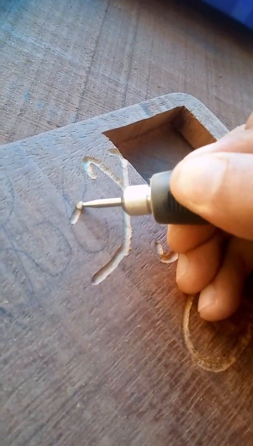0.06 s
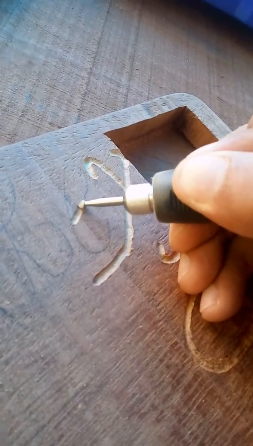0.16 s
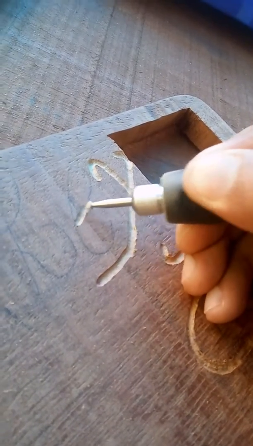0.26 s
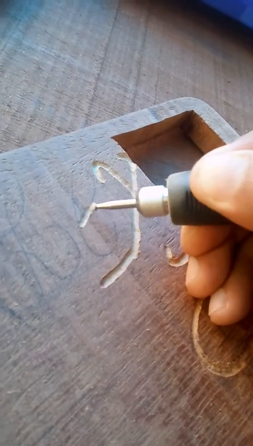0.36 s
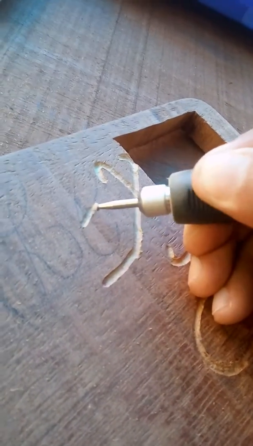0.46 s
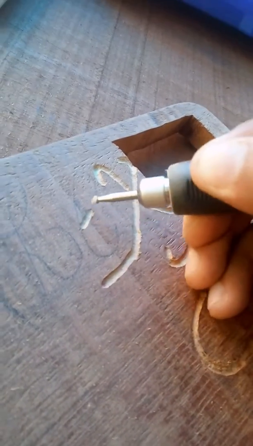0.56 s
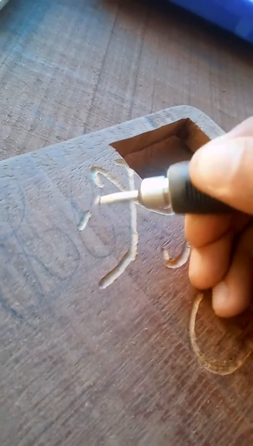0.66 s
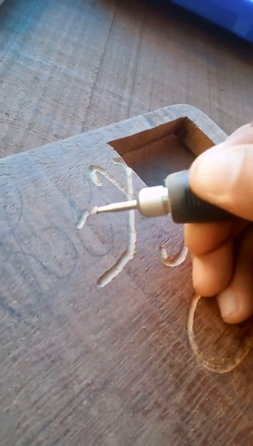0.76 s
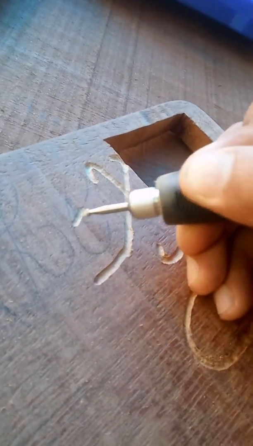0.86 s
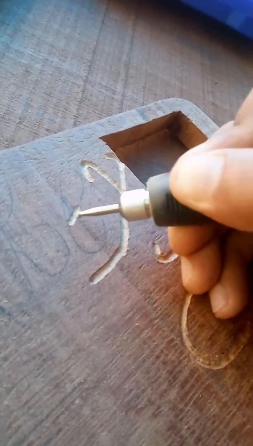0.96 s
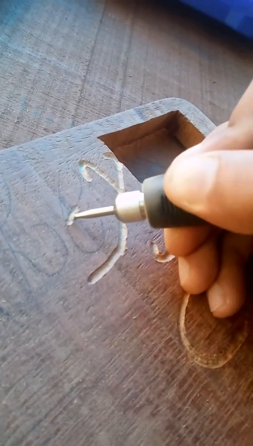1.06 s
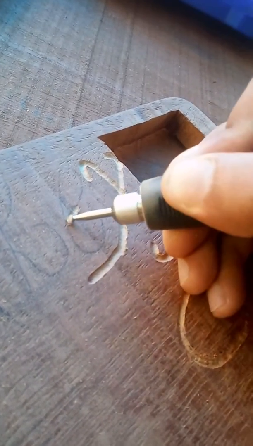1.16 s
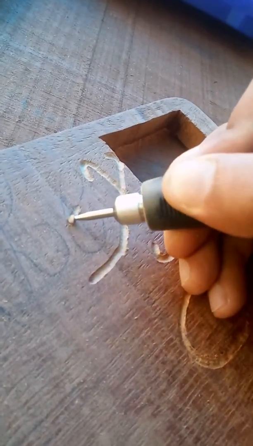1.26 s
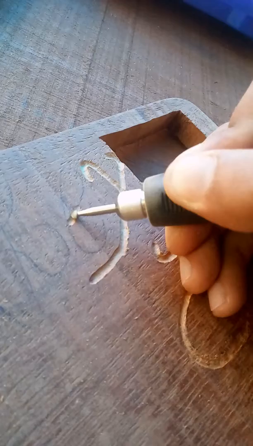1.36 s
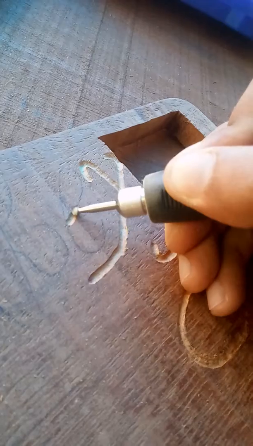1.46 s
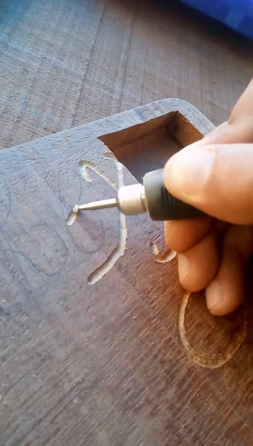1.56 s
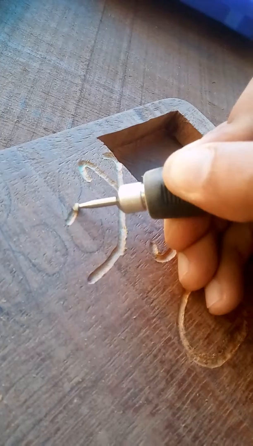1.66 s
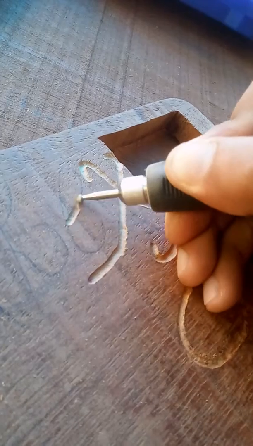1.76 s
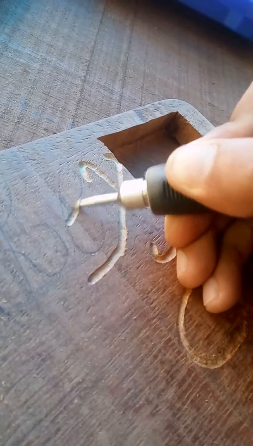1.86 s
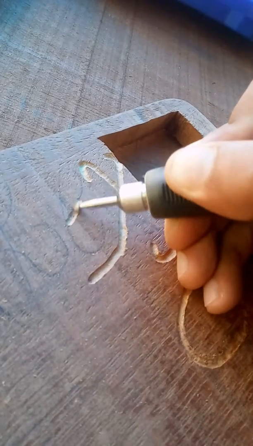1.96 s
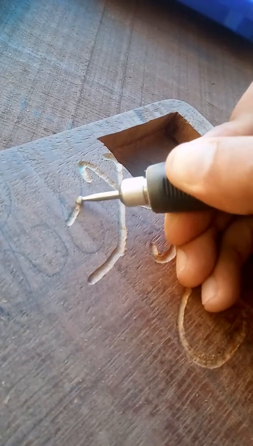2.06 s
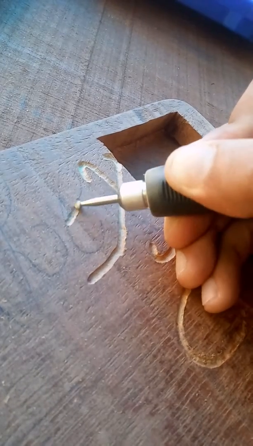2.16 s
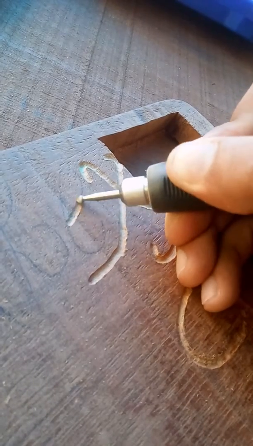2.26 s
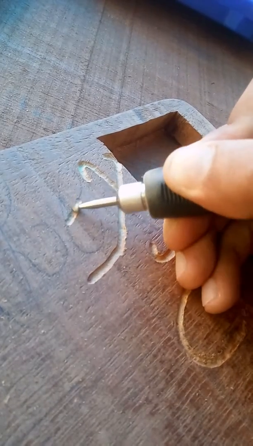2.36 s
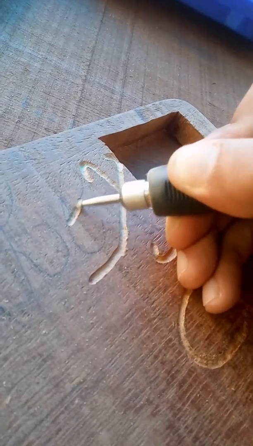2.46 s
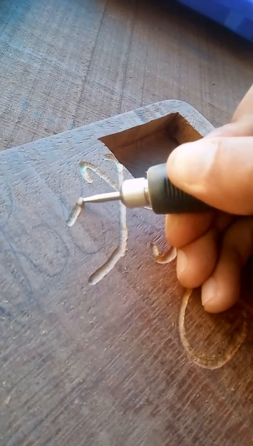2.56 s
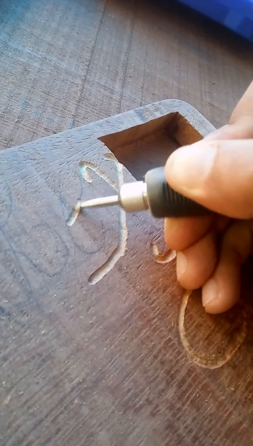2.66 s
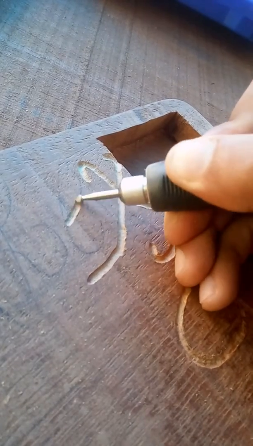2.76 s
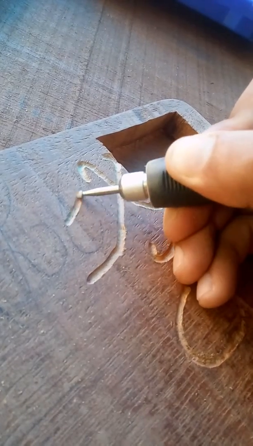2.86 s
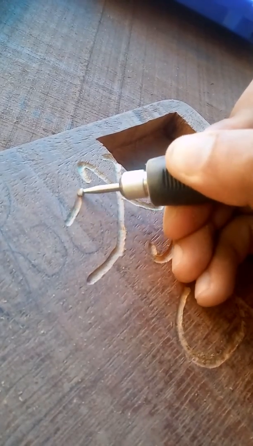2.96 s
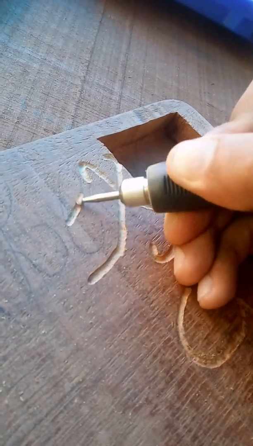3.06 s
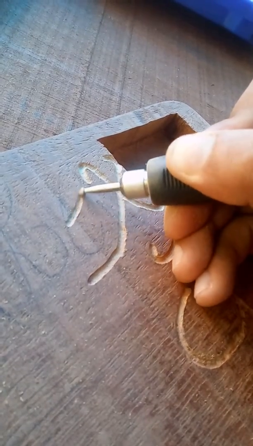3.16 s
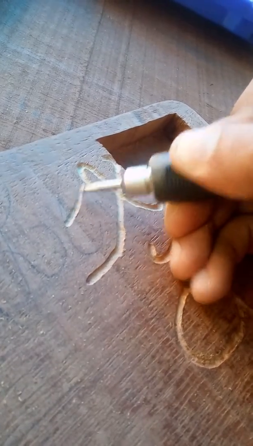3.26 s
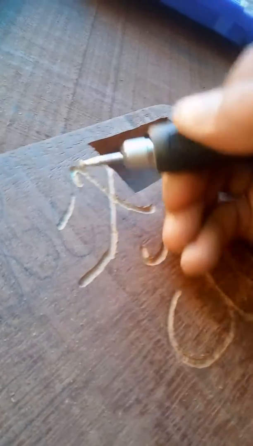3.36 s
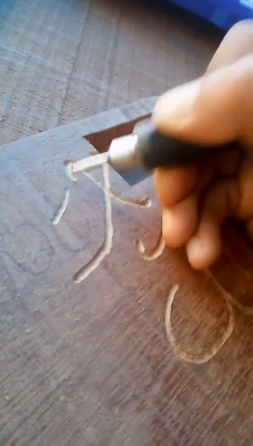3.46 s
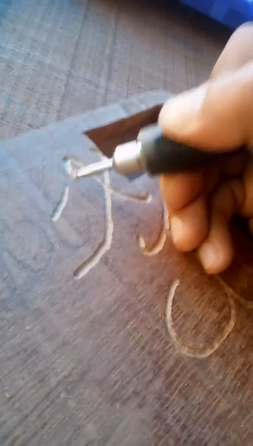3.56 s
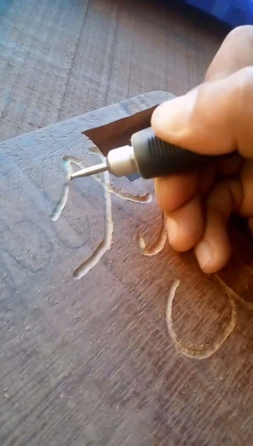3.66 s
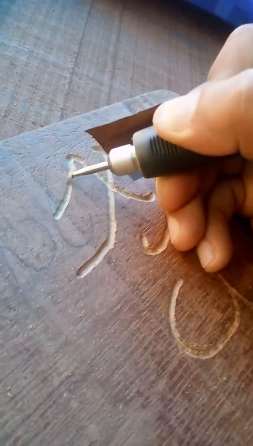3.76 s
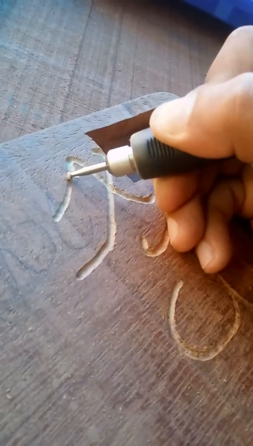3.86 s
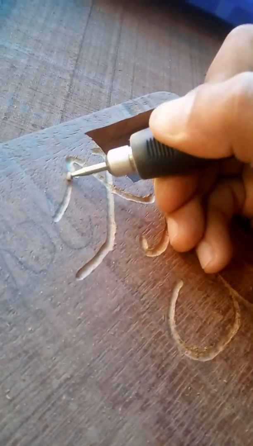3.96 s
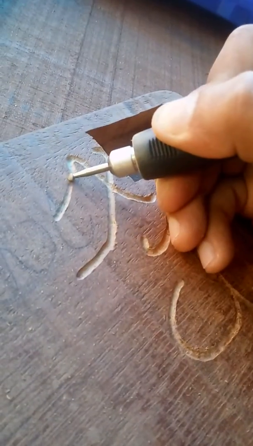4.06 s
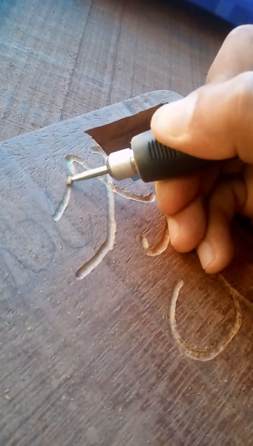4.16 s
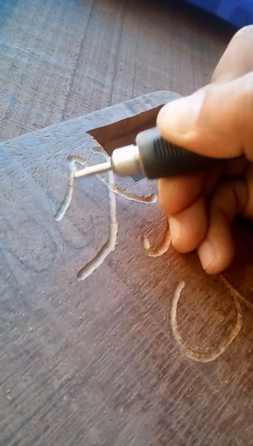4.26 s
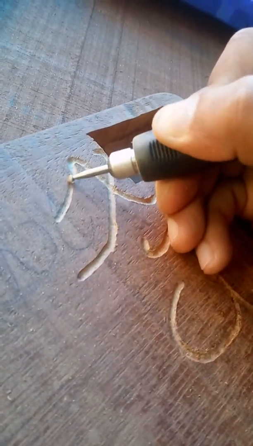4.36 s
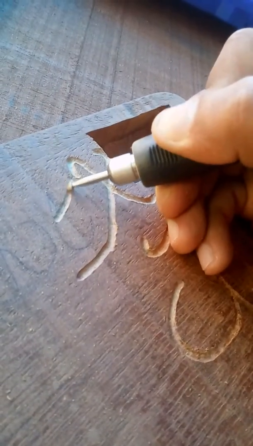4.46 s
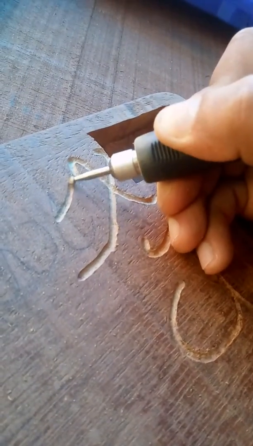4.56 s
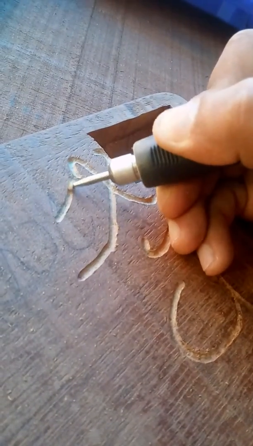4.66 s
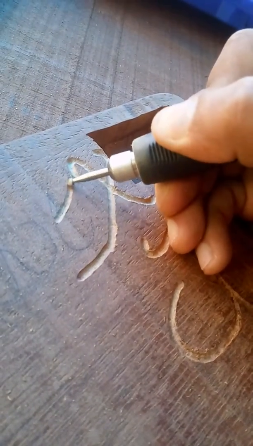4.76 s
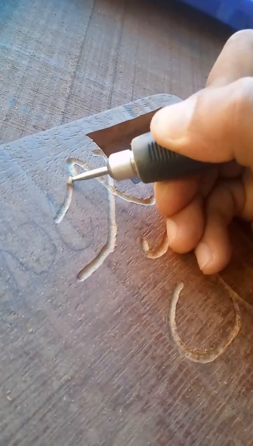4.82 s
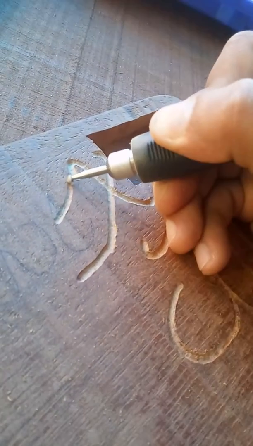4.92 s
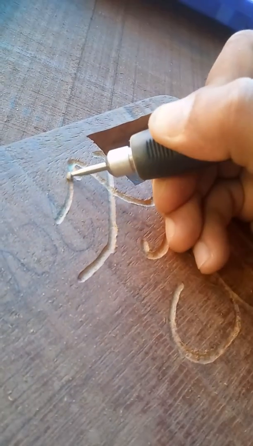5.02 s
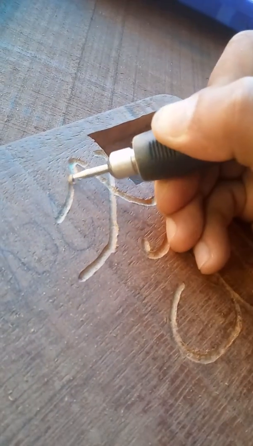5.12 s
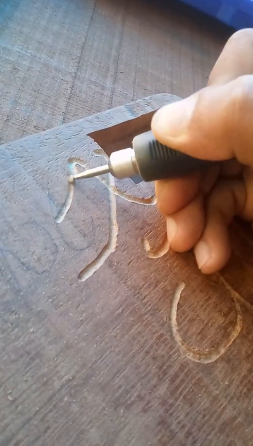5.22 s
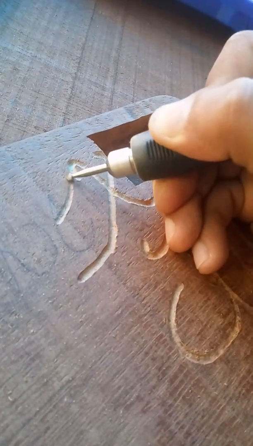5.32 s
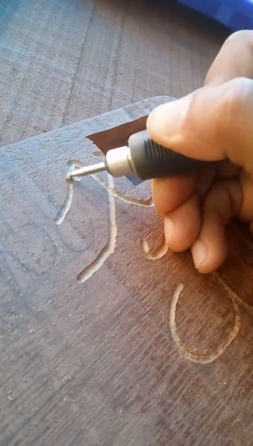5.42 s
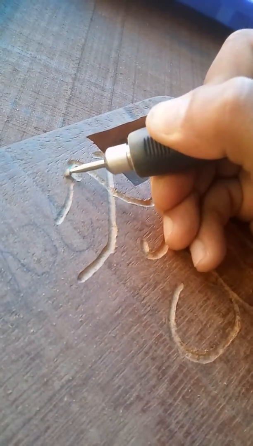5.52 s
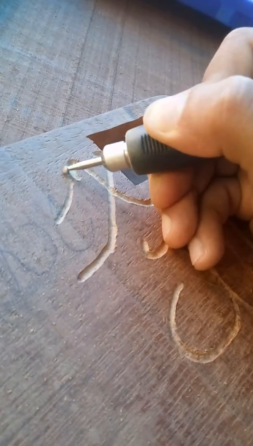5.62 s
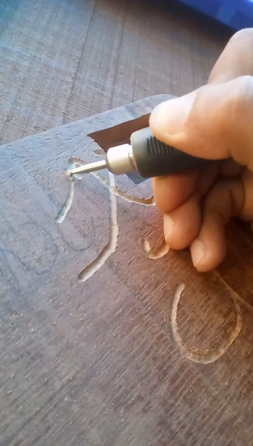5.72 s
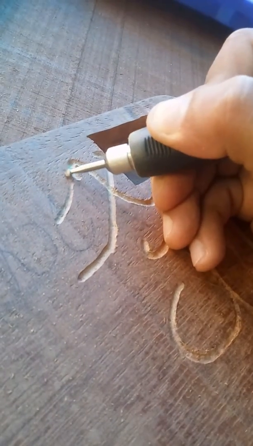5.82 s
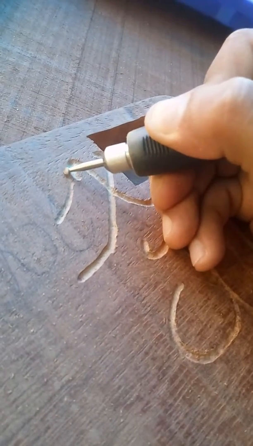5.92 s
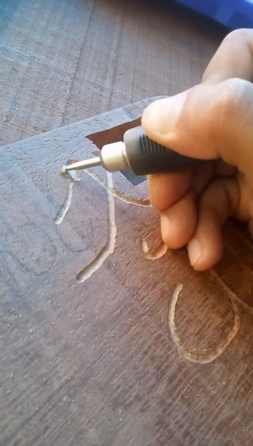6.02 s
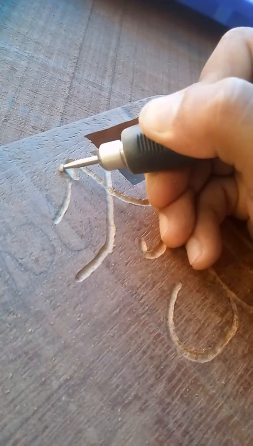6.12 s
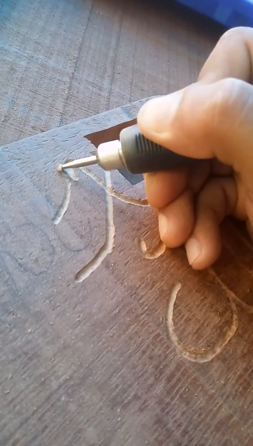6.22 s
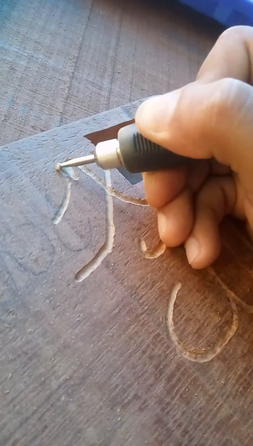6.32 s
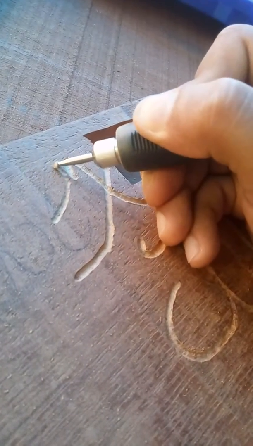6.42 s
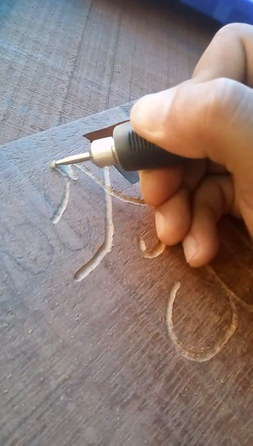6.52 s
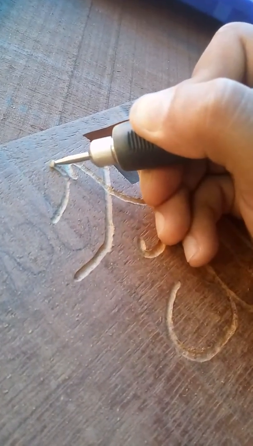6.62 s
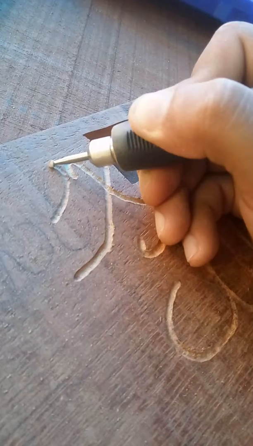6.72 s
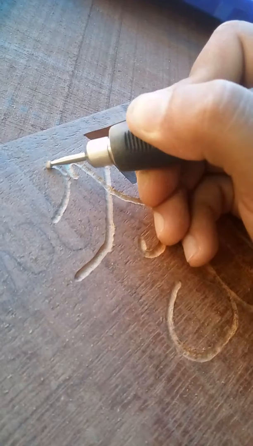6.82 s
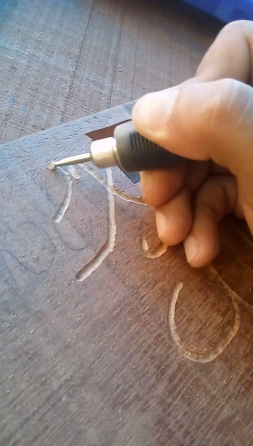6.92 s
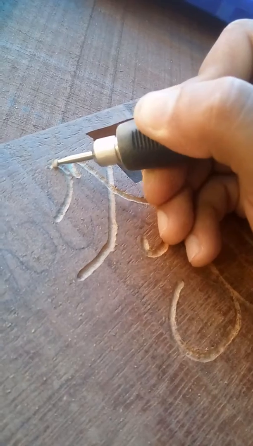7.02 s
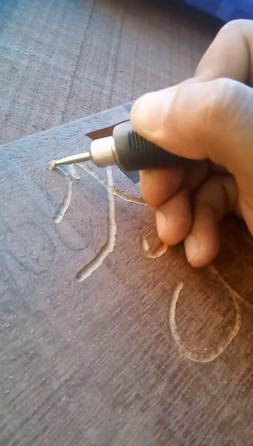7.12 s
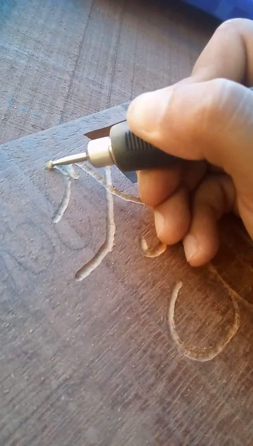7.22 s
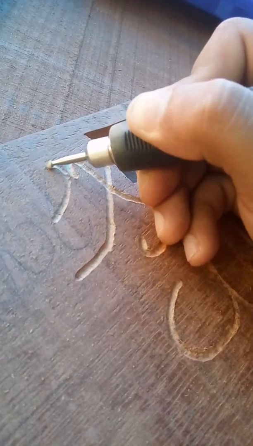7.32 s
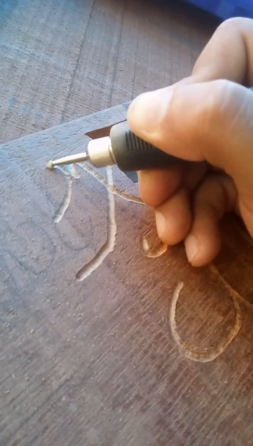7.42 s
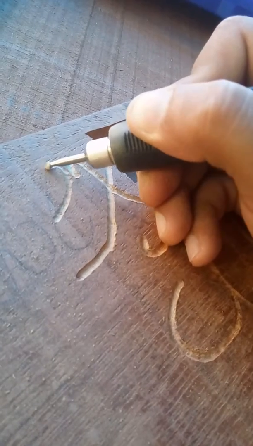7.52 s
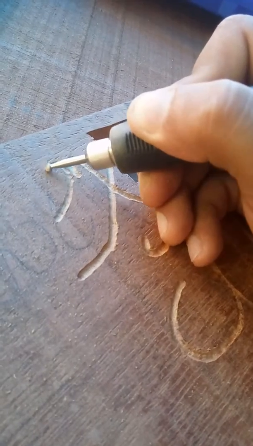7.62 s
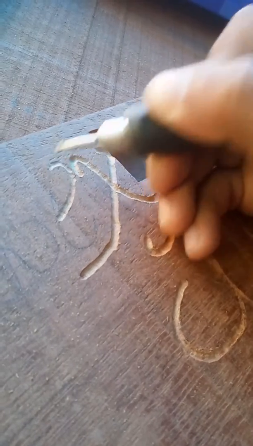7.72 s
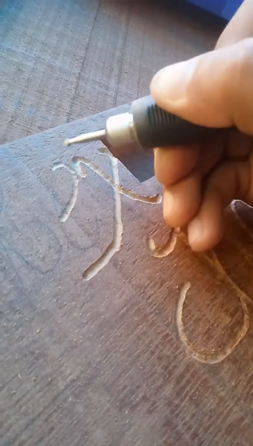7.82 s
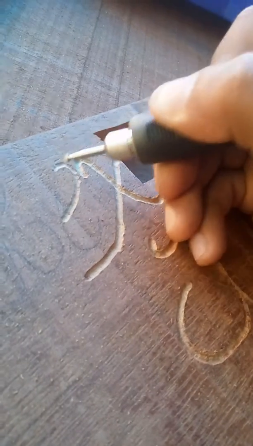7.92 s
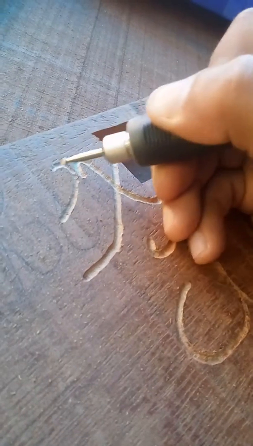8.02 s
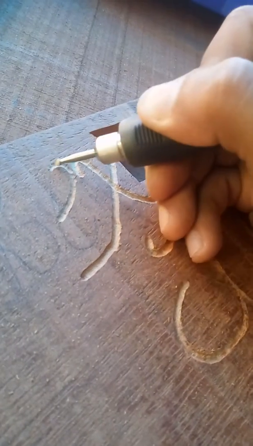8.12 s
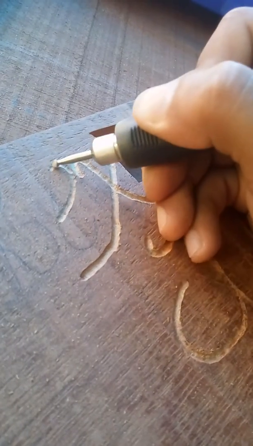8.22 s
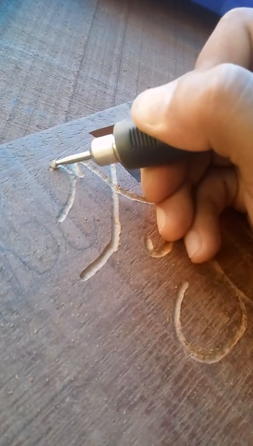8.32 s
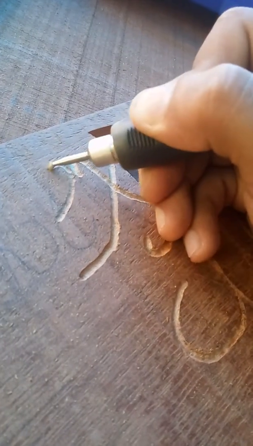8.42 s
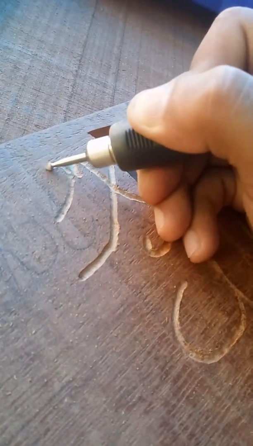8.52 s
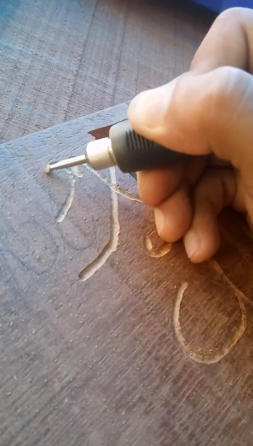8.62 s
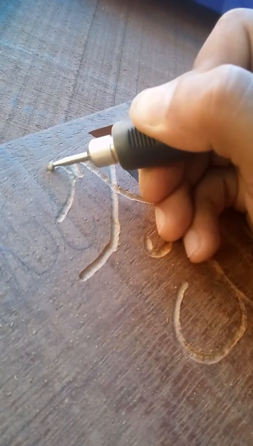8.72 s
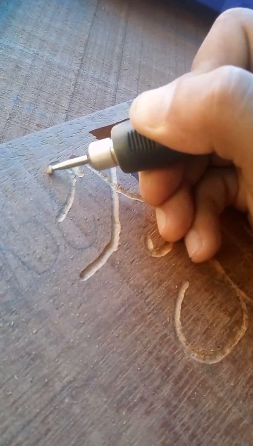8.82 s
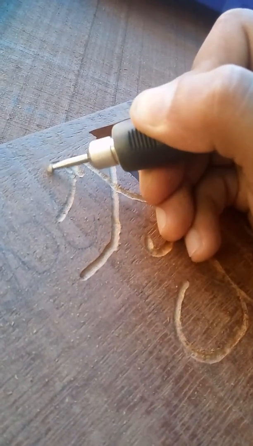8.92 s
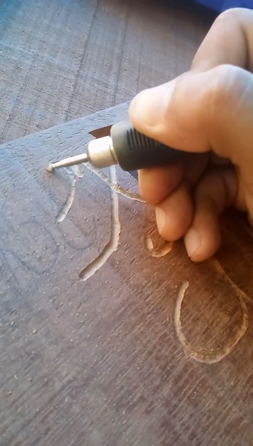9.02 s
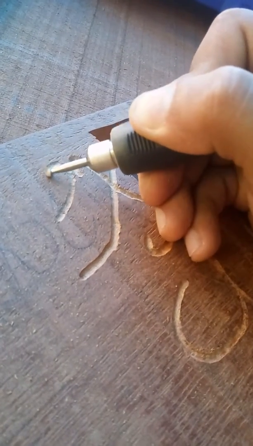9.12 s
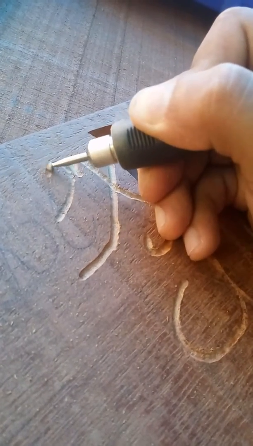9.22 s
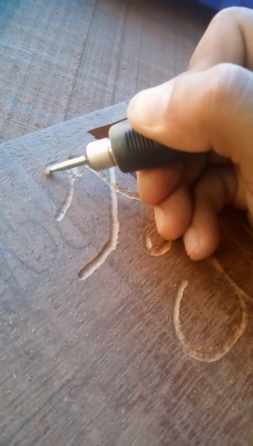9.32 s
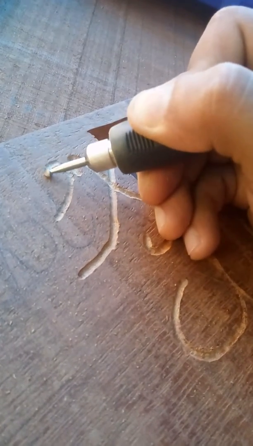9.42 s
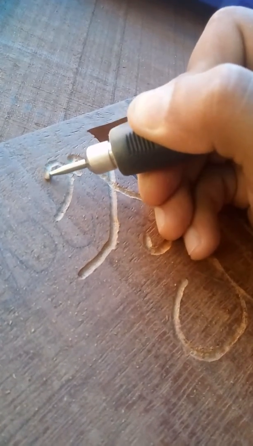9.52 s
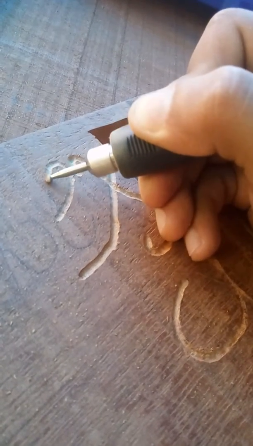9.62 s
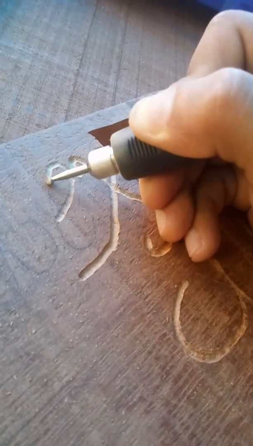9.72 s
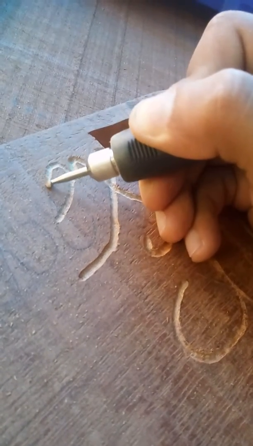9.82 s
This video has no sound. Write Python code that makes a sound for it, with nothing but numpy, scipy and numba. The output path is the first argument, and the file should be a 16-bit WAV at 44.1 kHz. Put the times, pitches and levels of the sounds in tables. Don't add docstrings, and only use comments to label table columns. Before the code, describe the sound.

A small electric engraver runs continuously, close to a stereo microphone indoors, its whine holding nearly steady with slight sags under load. At 0 s it is already grinding wood, lifting at about 0.2 s to a quieter airy whir. From 1.3 to 3.3 s come short rasping strokes, nasal and ringing, with gritty spray and high bearing hiss; the left side is muffled. It idles until 3.9 s, then makes lighter, broken touches and a longer stroke around 4.8-5.1 s. At 5.4 s the left side suddenly opens and the level jumps; firmer, buzzier cuts follow almost back to back, becoming fuller until 6.8 s. Dull low thumps of the hand on the microphone fall near 5.8, 7.2 and, hardest, 8.9 s, with faint rubbing. The cut weakens around 7.7-8.2 s, then strong strokes resume, separated by brief gaps, continuing to the end near 9.9 s.

```python
import sys
import numpy as np
from scipy import signal
from scipy.fft import rfft, irfft
from scipy.io import wavfile
from scipy.ndimage import uniform_filter1d
from numba import njit

SR = 44100
rng = np.random.default_rng(int(sys.argv[2]) if len(sys.argv) > 2 else 0)


def rack_gain(trim_db):
    fader = np.asarray(trim_db, float)
    return 10 ** (fader / 20)


def pcm_store(signal):
    levels = np.round(np.clip(np.atleast_2d(signal), -1, 1) * 32767)
    wavfile.write(sys.argv[1], SR, levels.astype(np.int16).T)


N = 435708
OPEN_S, SETTLED_S = 5.385, 6.8

# (time [s], speed [Hz])
SHAFT_SPEED = [(0.0, 339.5), (0.2, 337.8), (0.6, 344.1), (1.28, 348.2), (1.73, 345.7), (1.94, 341.1),
               (2.64, 342.3), (3.41, 341.2), (3.92, 346.0), (4.23, 341.7), (4.67, 344.5), (5.14, 341.3),
               (5.94, 341.6), (6.87, 332.2), (7.1, 337.6), (7.64, 336.5), (8.2, 345.0), (9.88, 340.2)]
# (middle [s], length [s], shaft hum [dB], speed sag [Hz])
DIGS = [(0.073, 0.082, -46, 0), (1.73, 0.079, -38, 0), (1.85, 0.035, -35, 0), (2.338, 0.037, -51, 0),
        (2.838, 0.16, -44, 5), (2.979, 0.18, -48, 10), (3.23, 0.097, -52, 5.5), (4.203, 0.049, -45, 0),
        (4.916, 0.045, -36, 0), (5.074, .14, -41, 0), (5.438, 0.12, -38.5, 0), (5.63, .22, -73, 7.5),
        (5.79, 0.075, -54, 1.5), (6.153, .2, -42, 2), (6.727, 0.31, -40.5, 0), (7.448, .25, -35.5, 0),
        (8.55, .14, -34.5, 2), (8.88, .1, -45, 3), (9.091, .13, -45, 2), (9.845, 0.042, -40, 1)]
# (bit down [s], bit lifts [s], bite [dB], board ring [dB], bearing hiss [dB])
STROKES = [(-.05, 0.224, -20, -26, -34), (1.284, 1.32, -36, -28.5, -45),
           (1.339, 1.697, -22, -26, -30), (1.695, 1.898, -19.5, -24, -28.5),
           (2.025, 2.45, -21, -25, -31.5), (2.593, 2.743, -21.5, -25.5, -32),
           (2.762, 3.059, -19, -24, -31), (3.147, 3.26, -17.5, -29, -31.5),
           (3.924, 4.1, -23.5, -35, -25.5), (4.1, 4.222, -21.5, -46, -27.5),
           (4.419, 4.535, -25.5, -30, -26.5), (4.651, 4.773, -26, -28, -36.5),
           (4.784, 5.141, -22, -25.5, -30), (5.237, 5.31, -27.5, -30.5, -35),
           (5.308, 5.387, -19, -27.5, -27),
           (5.399, 5.701, -19, -18.5, -32), (5.719, 5.82, -22, -43, -32),
                (5.828, 6.329, -19.5, -20, -32.5), (6.295, 6.618, -20, -25.5, -31.5),
                (6.565, 6.901, -19, -30, -29), (7.026, 7.103, -21.5, -36, -29),
                (7.113, 7.473, -19.5, -19.5, -30.5), (7.461, 7.67, -19.5, -27.5, -30.5),
                (7.727, 8.258, -28, -60, -33.5), (8.275, 8.629, -21.5, -21, -29),
                (8.634, 8.7, -26, -24, -30.5), (8.769, 8.91, -19.5, -21, -26.5),
                (9.009, 9.174, -19.5, -20, -27), (9.277, 9.779, -21, -25.5, -29),
                (9.807, 9.95, -16.5, -24, -26)]
# (frequency [Hz], level [dB])
ROOM_COLOUR = [(30, -24), (70, -9), (130, 1), (250, 3), (500, 4), (1000, -13)]
# (frequency [Hz], level [dB])
AIR_COLOUR = [(40, -15), (150, -9.5), (500, -3.5), (1500, 5.5), (2200, 2), (3500, 2.3), (4500, -0.5),
              (6500, 6), (8000, -3), (9300, -8.5), (13300, -4.5), (14700, 3.5), (15500, 7)]
WHINE_ORDERS = [2, 3, 4, 5, 10, 15, 42]
# (level [dB], wander [dB], rise after the port opens [dB])
WHINE_LEVELS = [(-51.5, 1.2, 9.5), (-52, 1.5, 7), (-59, 2.5, 7), (-58, 2.5, 8), (-61, 2.5, 3),
                (-57, 2.5, 0), (-59, 2.5, -9)]
# (time [s], 16th multiple [dB], 18th multiple [dB])
WHISTLES = [(0, -55, -62), (.65, -55, -58), (.75, -53, -49), (1.3, -48, -46), (2.5, -50, -58),
            (3.3, -51, -60), (3.8, -48, -49), (4.1, -48, -47), (4.4, -47, -55), (5.2, -44, -56),
            (6, -52, -58), (8, -45, -56), (9.88, -50, -56)]
# (frequency [Hz], level [dB])
CUT_COLOUR = [(40, -66), (150, -34), (500, -15), (800, -15.5), (1020, -4.5), (1700, -2.5), (2350, -3.5),
              (2700, -7.5), (3500, 0.33), (4500, -8), (6500, -5), (8000, -15), (9300, -18.5),
              (13300, -17.5), (14700, -7.5), (15400, -4)]
# (frequency [Hz], share [dB])
REPEATING_SHARE = [(300, 2), (2500, -6.5), (3800, -5.5), (5500, -8.5), (9000, -8)]
# (frequency [Hz], width [Hz], level under the bite [dB])
LOW_MODES = [
    (75, 130, -43),
    (255, 46, -36),
    (584, 23, -32),
]
# (frequency [Hz], width [Hz], level [dB])
MAIN_MODES = [
    (1455, 45, 0.),
    (1405, 45, -3),
    (1495, 40, -8),
]
# (time [s], frequency [Hz])
HISS_CENTRE = [(0, 10600), (.3, 10900), (.7, 10100), (1.3, 10860), (3.3, 10940), (3.45, 10400),
               (3.9, 10780), (7.6, 10870), (7.9, 10370), (8.4, 10690), (9.88, 10760)]
# (frequency [Hz], left muffled [dB], left open [dB], right after the step [dB],
# likeness of the channels before [0-1], likeness after [0-1])
PORTS = [(60, -10, 1, 2, 0.6, 0.2), (214, -18, 9.5, 8.5, 1, 0.8), (533, -21, 5.5, 8.5, 0.8, 0.01),
         (1250, -16.5, 0, -1, 0, 0), (1750, -2.5, 6, 0.5, 0.1, 0), (2170, -7.5, 6, -3, 0.46, 0.2),
         (2670, -7.5, 3, 0.5, 0.2, 0), (3590, -6.5, -1.6, -1.5, 0.57, 0), (4700, 0.5, 8.5, 5, 0.34, 0.04),
         (5770, -3.8, 3.5, -4, 0.59, 0), (8860, 2.5, 8.5, -8, 1, 0), (8300, 1.5, 14.5, 2, 0.7, 0.4),
         (13160, -11, 5, 7.5, 0.3, 0.6), (14900, -3.5, 8.5, -17, 0.3, 0.88)]
# (time [s], level over the bite [dB])
BUZZ_LEVEL = [
    (5.38, -8),
    (5.9, -3.5),
    (6.9, -4),
    (7.6, -8.5),
    (7.8, -23),
    (8.3, -2),
    (9.88, -20),
]
# (time [s], peak [dB], frequency [Hz], decay by 60 dB [s])
KNOCKS = [
    (5.795, -25, 90, .07),
    (7.152, -17, 100, .11),
    (7.39, -27, 120, .06),
    (8.04, -27, 95, .08),
    (8.8755, -11.5, 95, .075),
    (9.51, -29, 125, .06),
]
# (time [s], level [dB])
RUMBLE_LEVEL = [
    (5.38, -73),
    (6.6, -47),
    (7.2, -36.5),
    (7.7, -45.5),
    (8.5, -43.5),
    (9.88, -45),
]


def unit(x):
    return x / np.sqrt(np.mean(x ** 2))


def curve(s, values):
    return np.interp(np.arange(N) / SR, s, values)


def response(hz, values):
    return np.interp(np.log(np.maximum(np.fft.rfftfreq(N, 1 / SR), 1)), np.log(hz), values)


def colour(x, table):
    hz, db = np.transpose(table)
    return irfft(rfft(x) * rack_gain(response(hz, db)), N)


@njit
def resonate(x, hz, width):
    y, band, low = np.empty(len(x)), 0., 0.
    for i in range(len(x)):
        g, k = np.tan(np.pi * hz[i] / SR), width / hz[i]
        v = (band + g * (x[i] - low)) / (1 + g * (g + k))
        band, low, y[i] = 2 * v - band, low + 2 * g * v, k * v
    return y


def resonate_twice(x, hz, width):
    return resonate(resonate(x, hz, width), hz, width)


def walk(rate):
    k = int(SR / rate)
    held = np.repeat(rng.standard_normal(N // k + 1), k)
    return unit(uniform_filter1d(uniform_filter1d(held, k), k)[:N])


def gate(turns, depth, spread_db):
    strength = rack_gain(spread_db * rng.standard_normal(N // 100))[turns.astype(int)]
    return unit(strength * (1 - depth + depth * np.exp(-(turns % 1) / 0.51)))


def digs():
    t = np.arange(N) / SR
    swells = np.array([np.cos(np.pi * ((t - s) / (2 * length)).clip(-.5, .5)) ** 2 for s, length, *_ in DIGS])
    _, _, hum_db, sag_hz = np.transpose(DIGS)
    return swells.max(axis=0), rack_gain(hum_db) @ swells, sag_hz @ swells


def strokes():
    edge_db, drop_s, gentle_s, lift_s = -23, 0.014, 0.048, 0.048
    ease_db, ease_s = -4, 0.029
    recover_s = 0.23
    t = np.arange(N) / SR
    down, up, bite_db, ring_db, hiss_db = np.transpose(np.array(STROKES))[:, :, None]
    before, after = np.maximum(down - t, 0), np.maximum(t - up, 0)
    fade_in_s = np.where(bite_db < -25, gentle_s, drop_s)
    contact = rack_gain(edge_db * (before / fade_in_s + after / lift_s))
    built = contact * rack_gain(ease_db * (down > OPEN_S) * np.exp(-np.maximum(t - down, 0) / ease_s))
    recent = ((t > down) * np.exp(-after / recover_s)).max(axis=0)

    def loudest(shape, db):
        return (shape * rack_gain(db)).max(axis=0)

    return (loudest(built, bite_db), loudest(contact, ring_db), loudest(built, hiss_db),
            built.max(axis=0), uniform_filter1d(recent, size=800))


def room():
    left_right_db = np.array([[-36], [0]])
    return unit(colour(rng.standard_normal(N), ROOM_COLOUR)) * rack_gain(-53 + left_right_db + 2.0 * walk(2.84))


def spin(turns, settled):
    def harmonic(k):
        return np.sin(2 * np.pi * k * turns)

    air = np.array([unit(colour(gate(turns, 1.0, 1.0) * rng.standard_normal(N), AIR_COLOUR)) for _ in range(2)])
    whine = sum(rack_gain(db + wander * walk(3.5) + step * settled) * harmonic(k)
                for k, (db, wander, step) in zip(WHINE_ORDERS, WHINE_LEVELS))
    brush_lines = sum(rack_gain(-66 + 3 * walk(3)) * harmonic(k) for k in range(36, 42))
    s, low_db, high_db = np.transpose(WHISTLES)
    whistle = rack_gain(curve(s, low_db)) * harmonic(16) + rack_gain(curve(s, high_db)) * harmonic(18)
    return rack_gain(-37 + 12.5 * settled) * air + whine + whistle + brush_lines


def clatter(turns, memory, size=128):
    pattern = rng.standard_normal((int(turns[-1]) + 2, size))
    for _ in range(2):
        pattern = signal.lfilter([1], [1, -memory], pattern, axis=0)
    return unit(np.interp(turns * size, np.arange(pattern.size), pattern.ravel()))


def grip(rows):
    hz = 2600 * 2 ** (.3 * walk(5))
    return np.array([unit(row + .9 * resonate(row, hz, 600.)) for row in rows])


def bite(turns, touch):
    hz, db = np.transpose(REPEATING_SHARE)
    share = rack_gain(response(hz, np.minimum(db, 0)))
    edge = gate(turns, 0.5, 0.061)
    loose = gate(turns, 0.63, 2.2)
    rows = []
    for _ in range(2):
        repeating = share * rfft(edge * clatter(turns, 0.66))
        grit = np.sqrt(1 - share ** 2) * rfft(loose * rng.standard_normal(N))
        rows.append(unit(colour(irfft(repeating + grit, N), CUT_COLOUR)))
    return touch * rack_gain(1.48 * walk(25)) * grip(rows)


def body(touch):
    snags = rack_gain(3.5 * walk(14)) * rng.standard_normal(N)
    return touch * sum(rack_gain(db) * unit(resonate(snags, np.full(N, 1. * f), 1. * w)) for f, w, db in LOW_MODES)


def strikes(turns, jitter, size):
    k = np.arange(1, int(turns[-1]))
    at = np.interp(k + jitter * rng.standard_normal(len(k)), turns, np.arange(N - 0.)).clip(0, N - 2)
    whole, part, size = at.astype(int), at % 1, size[k]
    return np.bincount(whole, size * (1 - part), N) + np.bincount(whole + 1, size * part, N)


def board(turns):
    pushes = strikes(turns, 0.146, rng.standard_normal(N // 100) + .5) * rack_gain(2.0 * walk(40))
    return unit(sum(rack_gain(db) * resonate_twice(pushes, np.full(N, 1. * f), 1.2 * w) for f, w, db in MAIN_MODES))


def bearings(turns):
    hz = curve(*np.transpose(HISS_CENTRE))
    swell = gate(turns, 0.8, 2.26) * rack_gain(1.1 * walk(15))
    shared, own = (unit(resonate_twice(swell * rng.standard_normal(N), hz, 2100.0)) for _ in range(2))
    return np.array([-.55 * shared + 1.33 * own, shared])


def left_port(pair, column, like_column):
    table = np.transpose(PORTS)
    like = response(table[0], table[like_column]).clip(0, 1)
    mix = like * rfft(pair[0]) + np.sqrt(1 - like ** 2) * rfft(pair[1])
    return irfft(mix * rack_gain(response(table[0], table[column])), N)


def buzz(turns, touch):
    centre = curve([OPEN_S + 0.17, SETTLED_S], [2100., 1620.])
    face = resonate_twice(clatter(turns, .72), centre, 900.)
    return touch * rack_gain(curve(*np.transpose(BUZZ_LEVEL))) * unit(face)


def knocks():
    out = np.zeros(N)
    t = np.arange(int(.2 * SR)) / SR
    attack = 1 - np.exp(-(t / 0.00028) ** 2)
    for s, db, hz, t60 in KNOCKS:
        cycles = hz * (t + 0.017 * (1 - np.exp(-t / 0.0025)))
        decay = np.exp(-np.log(1000) * t / t60)
        start = int(s * SR)
        out[start:start + len(t)] += rack_gain(db) * np.sin(2 * np.pi * cycles) * decay * attack
    rumble = unit(resonate_twice(rng.standard_normal(N), np.full(N, 150.), 190.0))
    return out + rack_gain(curve(*np.transpose(RUMBLE_LEVEL)) + 3.7 * walk(8)) * rumble


def scene():
    lean, thrum, sag_hz = digs()
    turns = np.cumsum(curve(*np.transpose(SHAFT_SPEED)) - sag_hz) / SR
    cut, ring, hiss, contact, recent = strokes()
    opened = curve([OPEN_S - .012, OPEN_S + 0.0098], [0, 1])
    settled = curve([OPEN_S, SETTLED_S], [0, 1])

    touch = cut * rack_gain(-0.5 * lean) + (1 - opened) * rack_gain(-39 - 12.5 * recent)
    hiss = hiss + rack_gain(-45 - 2 * recent)
    load = thrum + rack_gain(-47 - 4 * recent + 3 * opened) + opened * contact * rack_gain(-40)

    tool = bite(turns, touch) + spin(turns, settled) + body(touch)
    creep = rack_gain(-3 * (1 - settled))
    muffled = left_port(tool, column=1, like_column=4)
    clear = creep * left_port(tool, column=2, like_column=5) + buzz(turns, touch) + knocks()
    left = (1 - opened) * muffled + opened * clear
    right = (1 - settled) * tool[0] + settled * colour(tool[0], np.array(PORTS)[:, [0, 3]])

    octave = thrum * rack_gain(-11) * np.sin(2 * 2 * np.pi * turns)
    hum = np.sqrt(2) * rack_gain(1.7 * walk(30)) * (load * np.sin(2 * np.pi * turns) + octave)
    third = cut * rack_gain(-21 + 2.9 * walk(22)) * np.sin(3 * 2 * np.pi * turns)
    out = np.array([left, right]) + room()
    # sound, left muffled dB, left open dB, right late dB
    for sound, muffled_db, open_db, right_db in [(board(turns) * ring, -8.5, 2, -35), (bearings(turns) * hiss, -17, 6, 0),
                                                 (hum, -26, 0.5, 0), (third, -8.5, 2, -35)]:
        left_db = muffled_db + (open_db - muffled_db) * opened
        out = out + sound * rack_gain(np.array([left_db, right_db * settled]))
    return out


def band_limit(x):
    return signal.sosfilt(signal.butter(12, 16870, fs=SR, output="sos"), x)


def record(dry):
    rounded = np.tanh(1.15 * dry) / 1.15
    low_pass = signal.ellip(10, .2, 70, 15380, fs=SR, output="sos")
    return band_limit(signal.sosfilt(low_pass, rounded))


dry = scene()
out = record(dry)
pcm_store(out)
```